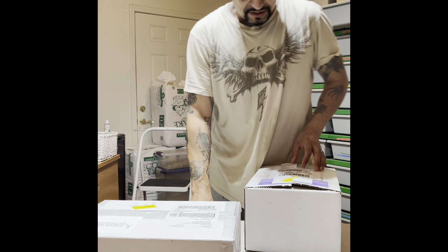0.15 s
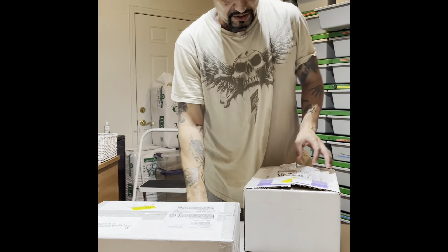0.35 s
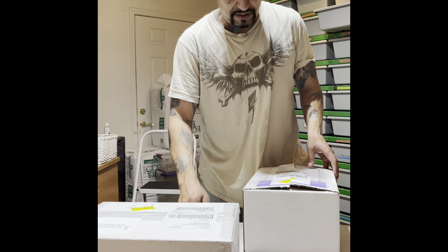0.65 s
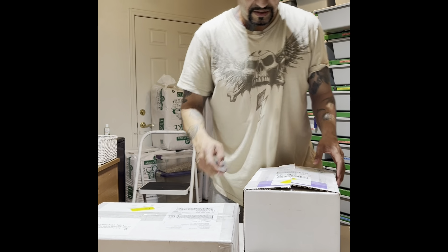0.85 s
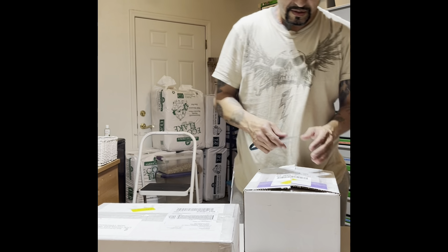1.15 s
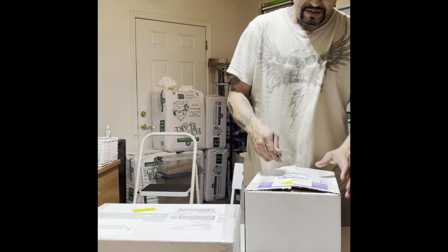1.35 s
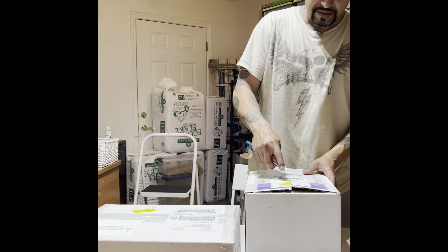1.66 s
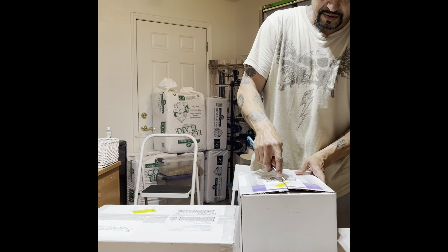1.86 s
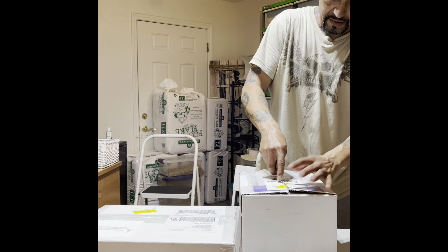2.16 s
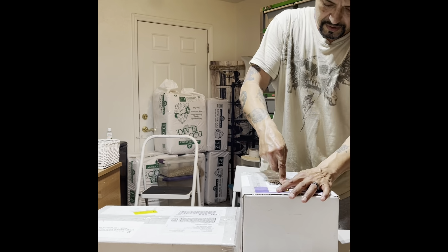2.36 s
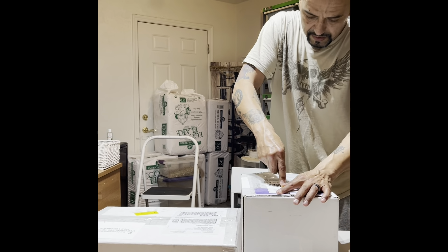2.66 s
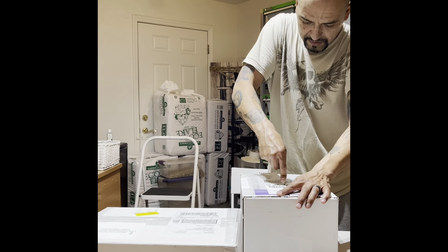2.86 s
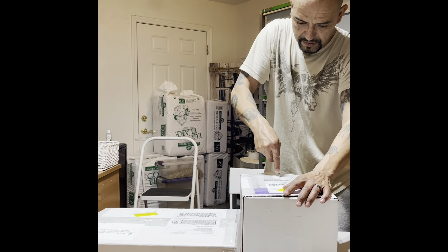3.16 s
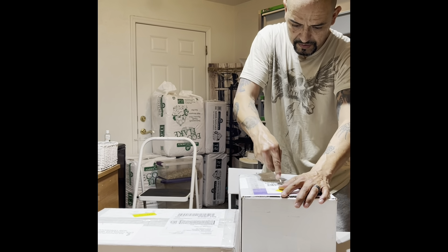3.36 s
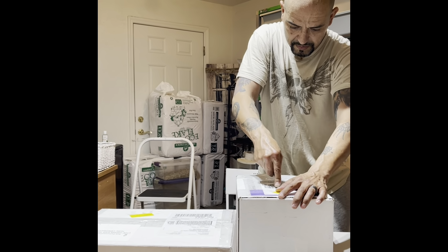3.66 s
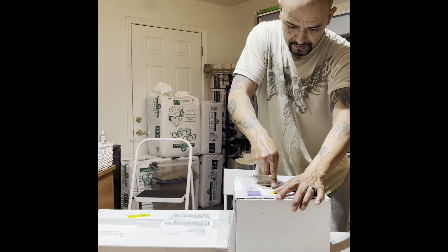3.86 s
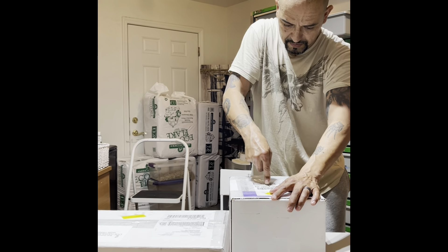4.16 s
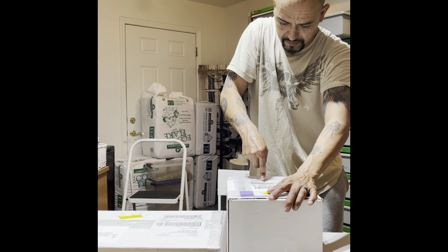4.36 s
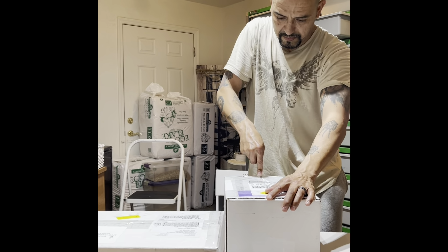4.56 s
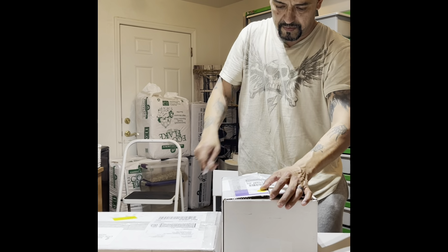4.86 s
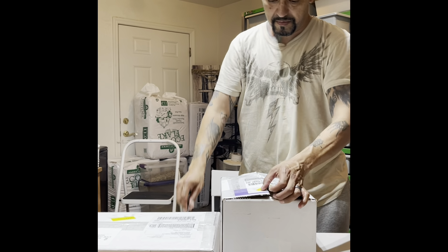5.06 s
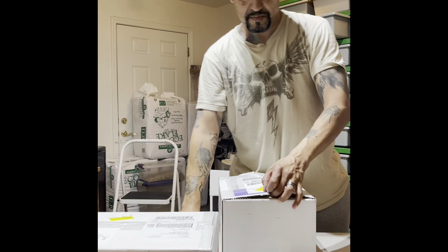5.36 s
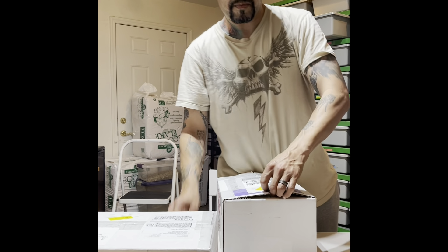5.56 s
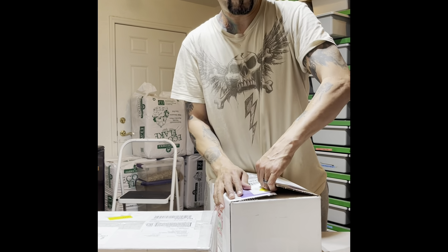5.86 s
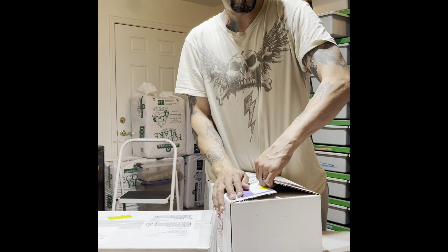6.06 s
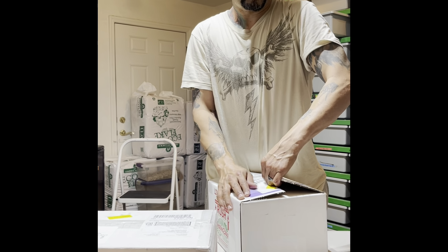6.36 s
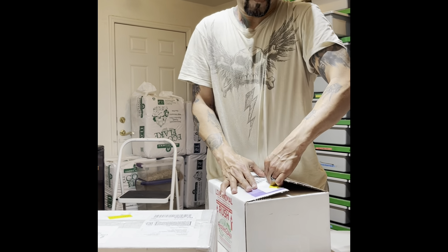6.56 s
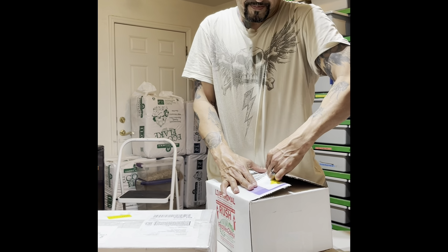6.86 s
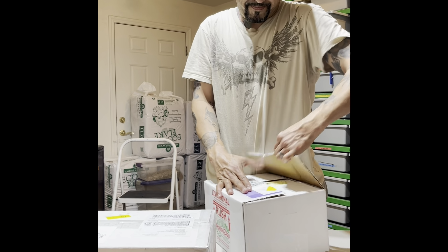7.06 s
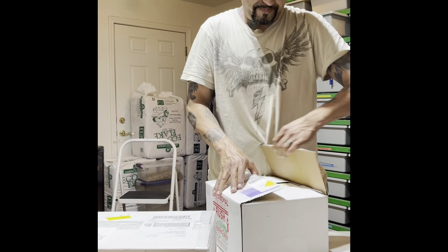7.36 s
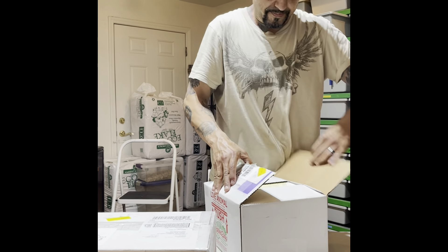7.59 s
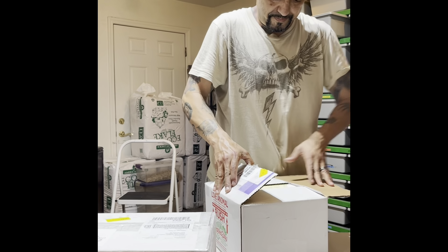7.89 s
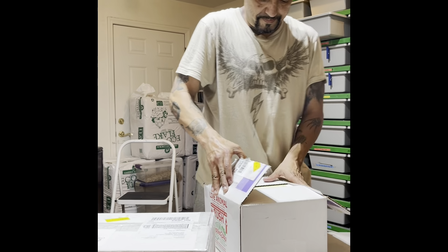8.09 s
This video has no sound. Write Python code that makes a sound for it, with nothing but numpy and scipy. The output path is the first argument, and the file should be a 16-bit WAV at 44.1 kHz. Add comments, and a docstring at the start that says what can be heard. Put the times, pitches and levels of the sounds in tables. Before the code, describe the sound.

A blade slits packing tape and saws a box seam, then is dropped with bouncing clacks before flaps tear open with loud snaps indoors

```python
"""Light knocks come first, as a man nudges a utility knife and lifts it off a big carton in a small storeroom.
He slits packing tape (sizzle and whistle), saws the seam and drops the knife, which bounces on the carton.
He pulls the flaps: tape snaps in sharp cracks, cardboard rings and creaks, and his hands hiss along it.
Blows are short pushes shaped by resonances; friction is a stream of tiny random slips, coloured by filters.
Room echoes and faint air noise surround it all, and a nearby phone picks it up in stereo."""
import sys
import numpy as np
from scipy import signal
from scipy.fft import rfft, irfft, next_fast_len
from scipy.io import wavfile
from scipy.ndimage import uniform_filter1d, map_coordinates

SR = 44100
rng = np.random.default_rng(int(sys.argv[2]) if len(sys.argv) > 2 else 0)


def unload_audio(sound):
    """Save the sound as a 16-bit wav file, at the path given as the first command line argument."""
    columns = np.transpose(np.atleast_2d(sound))
    # keep every value between -1 and 1, then stretch to whole-number steps
    steps = np.round(np.clip(columns, -1, 1) * 32767)
    wavfile.write(sys.argv[1], SR, steps.astype(np.int16))


N = 362898  # length in samples

# All table levels are relative: each layer adds its own gain.
# A t60 is the time a sound takes to fall by 60 dB.

# The knife is nudged and lifted off the carton, later dropped on it, and bounces to rest:
# start_s, level_db, clack_db, carton_ring_db, top_hz (of the contact's band), lid_hz (pitch at that spot)
KNIFE_KNOCKS = [(.029, -25, -4.5, 3, 2350, 604), (.107, -13, -14, -2.5, 1900, 677),
                (0.132, -19.5, -4.5, -2, 2370, 890), (.143, -17, -8, -3.5, 2370, 836),
                (0.279, -27, 2.5, -1, 2400, 950), (.329, -14.5, -15, -5, 1400, 610),
                (.338, -19, 0.5, -6, 2540, 1090), (5.44, -25.5, 8, 9, 4260, 655),
                (5.4898, 1.5, 6, -6.5, 3300, 1260), (5.495, -5.5, -10, -3, 2600, 1400),
                (5.5521, -1.5, 1.5, -8, 3330, 1020), (5.556, -6, 2.5, -4, 2700, 760),
                (5.5994, -6, 0, -9.5, 3200, 910), (5.639, -12.5, 2.5, 3, 3010, 1140),
                (5.669, -15.5, 5.5, 3, 3000, 990), (5.694, -19, -1.5, 4.5, 3080, 1200),
                (5.715, -17, -1, -2, 2300, 850), (5.732, -18.5, -0.5, -9, 2010, 1080),
                (5.763, -22.5, -4, -3, 1800, 833)]
# Tape snaps and the flap's fold ticks: start_s, level_db, treble_db, twang_hz, twang_width_octaves
TAPE_SNAPS = [(1.507, -46, -20, 2700, 0.48), (1.752, -37.5, -30, 1200, 1.07),
              (2.037, -42.5, -3.5, 1070, 0.99), (2.491, -25.5, 0, 890, .7), (2.86, -21, 0.5, 1500, 0.87),
              (3.143, -45, 1, 945, 0.64), (3.893, -27.5, -15, 2460, 0.92), (4.128, -32, -14, 1600, .55),
              (4.365, -27, -6.5, 2000, 0.95), (4.444, -33.5, 3, 3000, .7), (4.449, -37, 1, 3000, .7),
              (4.566, -39, -11, 1450, 0.78), (4.644, -29.5, -3, 3840, 0.46), (4.909, -41, -7, 2880, 0.16),
              (5.369, -33.5, -4.5, 2600, 0.84), (5.915, -4, -12, 2720, 0.85),
              (5.919, -15.5, -13, 1310, 1.4), (6.332, -47, 0, 1860, .7), (6.417, -48, 6.5, 1900, 0.55),
              (6.548, -53, 7, 3100, .7), (6.592, -1.5, -13, 2410, 0.41), (6.597, -11.5, -20, 1540, 0.28),
              (6.7638, -7, -8.5, 1950, 1.03), (6.769, -20, -5, 2400, 2.1), (6.852, -34.5, 4.5, 991, 0.64),
              (6.9095, -13, -1, 1800, 1.3), (6.919, -19, 0, 1400, 0.58), (6.951, -14, -5.5, 2300, 1.15),
              (6.955, -14.5, -7.5, 1900, 1.06), (7.568, -28, -31, 1650, 0.6), (7.583, -35, -21, 1540, 0.46),
              (8.127, -40, -7, 1570, .7)]
# Hands and flaps bump the box: start_s, level_db, deep_boom_db, pitch_hz
BOX_BUMPS = [(.53, -37, -16, 328), (1.75, -37, -12, 330), (2.046, -40, 2, 240), (2.101, -35.5, -25, 265),
             (2.251, -41.5, -2.5, 190), (2.44, -23.5, -10, 787), (2.488, -13.5, -24.5, 650),
             (2.52, -18, 7.5, 493), (2.547, -22, 7.5, 315), (2.729, -28.5, -15, 275.5),
             (2.82, -25, -26.5, 546), (2.853, -28, -20, 229), (3.403, -37.5, -12, 250),
             (3.797, -39, -22, 600), (3.878, -36.5, -8, 503), (3.893, -31.5, -3, 251),
             (3.942, -32, -6, 380), (4.123, -25, -7.5, 356), (4.272, -26, -7, 237),
             (4.318, -24.5, -12, 330), (4.363, -24, -3.5, 199), (4.366, -33, -22, 750),
             (4.478, -31, -12, 263), (4.503, -27.5, -6, 278), (5.26, -35.5, 4, 215), (6.43, -34, -17, 270),
             (6.954, -12, -10, 535), (6.964, -21.5, -16, 313), (7.482, -32, -3, 217),
             (7.574, -37, -11, 164), (7.64, -47, 2, 220), (8.061, -28.5, -4, 185)]
# Carton panels and flaps ring on after knocks, squeaks and snaps: start_s, level_db, pitch_hz, t60_s
PANEL_RINGS = [(.112, -19, 166, 1), (.33, -16, 570, .07), (0.414, -16, 163, 0.55),
               (0.441, -16.5, 989, 0.19), (5.492, -3, 170, 0.78), (5.492, -12, 355, 0.35),
               (5.916, -0.5, 429, 0.064), (5.917, -8.5, 255, 0.13), (6.592, -3, 274, 0.14),
               (6.763, -4, 1195, 0.3), (6.768, -6.5, 1014, 0.61), (6.767, -5.5, 341, 0.051)]
# The blade slits taut tape, one list per slit: time_s, level_db, whistle_hz
TAPE_SLITS = [
    [(2.1, -56, 6000), (2.13, -61, 6550), (2.22, -56, 6560), (2.35, -44, 6350), (2.45, -47.5, 6160),
     (2.6, -47, 6660), (2.8, -44, 6410), (2.88, -39.5, 6330), (2.96, -48.5, 6210), (3.06, -80, 6200)],
    [(3.29, -72, 7000), (3.34, -47.5, 7370), (3.76, -47.5, 7280), (3.88, -55, 7330)],
]
# Whistle against sizzle, one value per slit: level_db
WHISTLE_LEVELS = [-2, -17]
# The blade saws through cardboard: start_s, length_s, level_db, change_along_stroke_db
CARDBOARD_CUTS = [(1.755, 0.096, -63, -5), (2.425, 0.043, -43, -1), (2.48, 0.09, -37, -6.5),
                  (2.6, 0.18, -60.5, 5.5), (2.78, 0.085, -44.5, 3.5), (2.87, 0.16, -48, -10),
                  (3.87, 0.06, -55, 3), (3.925, .065, -47.5, -3), (4.07, 0.04, -60, 6),
                  (4.105, .03, -43.5, 1), (4.225, 0.095, -53, 6), (4.34, 0.18, -49.5, -3),
                  (4.53, 0.058, -53, -13)]
# Palms and shirt slide over cardboard: start_s, length_s, level_db, change_along_stroke_db
HAND_SLIDES = [(-.03, 0.13, -66, -1), (.39, 0.45, -55, -20.5), (1.22, 0.14, -65, 7),
               (1.29, 0.23, -53.5, -9.5), (1.55, 0.35, -66, -4), (1.99, 0.52, -71, 16),
               (3.0, 0.19, -62, -4), (4.57, 0.58, -59, -16.5), (5.245, 0.21, -57, -12),
               (5.67, 0.25, -50, -10.5), (5.95, 0.26, -62.5, -4.5), (6.215, 0.56, -58.5, -19.5),
               (7.12, 0.33, -55.5, 0.5), (7.46, 0.12, -64.5, 14.5), (7.57, 0.12, -52, -3.5),
               (7.68, 0.34, -60.5, -6.5), (7.94, 0.35, -59, -0.5)]
# The box grumbles as it is pushed about: start_s, length_s, level_db, change_along_push_db
BOX_PUSHES = [(.1, 0.46, -57.5, 3), (.6, 0.44, -61, -3), (1.3, 0.57, -68, 9), (2.03, 0.34, -58, -18),
              (2.48, 0.26, -41.5, -17), (2.79, 0.066, -36, -1), (2.88, 0.2, -45.5, -2),
              (3.1, 0.12, -56, -8), (3.39, 0.083, -53, -4), (3.79, 0.11, -51.5, 1.5),
              (3.88, 0.094, -43.5, -1.5), (4.0, 0.36, -51, 3), (4.27, 0.32, -45, -9.5),
              (4.53, 0.33, -62.5, 0), (5.19, 0.17, -59, 7), (5.45, 0.37, -45.5, -9), (6.22, 0.62, -53, -15),
              (6.95, 0.19, -43, -5.5), (7.13, 0.37, -61.5, 4.5), (7.52, 0.26, -49.5, -9.5),
              (7.93, 0.091, -54.5, 3), (8.04, 0.21, -51.5, -3)]
# The knife squeaks on the carton and the flap's fold creaks:
# middle_s, length_s, level_db, slips_per_s, resonance_hz, pitch_bend_octaves_per_s
SQUEAK_EVENTS = [(0.273, 0.045, -44.5, 185, 575, 2), (0.418, 0.013, -47, 590, 1900, 1),
                 (0.446, 0.03, -43, 630, 1880, -0.1), (0.447, 0.036, -45, 620, 1160, -0.5),
                 (0.464, 0.028, -53, 630, 3820, -1.5), (0.553, 0.016, -48.5, 1000, 2950, -1.5),
                 (0.575, 0.013, -43.5, 1150, 3340, -0.5), (.568, 0.018, -45, 930, 2120, 3.5),
                 (0.584, 0.018, -46.5, 300, 1680, 3.5), (5.19, 0.12, -65.5, 290, 2200, 0.5),
                 (7.633, 0.035, -47.5, 160, 476, -3), (7.754, .014, -52.5, 260, 1400, -4),
                 (7.778, 0.056, -51, 160, 508, -2), (7.879, 0.065, -58, 203, 553, -2)]

# Ringing tones of the big carton: pitch_hz, level_db, t60_s
CARTON_TONES = [(167.4, -12.5, 0.7), (350, -10, 0.46), (545, 1.5, 0.25), (683, 5, 0.11), (971, 3, 0.12),
                (1177, -1.5, 0.18), (1404, -6.5, 0.15)]
# Ringing tones of the air and walls of the box: pitch_hz, level_db, t60_s
BOOM_TONES = [(56.8, 3, 0.25), (86, -11, 0.44), (117.5, -7, 0.47)]
# Resonances of the knife's handle: centre_hz, width_hz, level_db
HANDLE_RESONANCES = [(1465, 250, 3.5), (1950, 360, 1), (2400, 280, 1.5), (2700, 300, 3), (3036, 440, 2),
                     (6200, 1900, -6), (7740, 700, -17), (11000, 2500, -0.5)]
# Resonances of the loose steel blade: centre_hz, width_hz, level_db
BLADE_RESONANCES = [(6200, 870, -8.5), (7540, 340, 10), (10000, 4400, 6)]
# Resonances of cardboard ridges giving way: centre_hz, width_hz, level_db
CRUNCH_RESONANCES = [(330, 230, -1.5), (680, 450, 0), (1400, 920, -3.5), (2400, 620, -4)]

# Spectrum of snapping or crinkling tape: frequency_hz, level_db (per Hz)
SNAP_SPECTRUM = [(100, -59), (500, -29), (1200, -23), (2500, -5), (4000, -5.5), (7000, -0.5), (9000, 2.5),
                 (10800, 4), (12300, -5), (15500, -65.5)]
# Spectrum of skin and cloth on cardboard: frequency_hz, level_db (per Hz)
PALM_SPECTRUM = [(150, -3), (600, -8.5), (2000, -5.5), (4500, -6.5), (6500, -5), (8500, -0.5), (10800, 3),
                 (12000, -10.5), (13200, -21.5), (15500, -59.5)]
# Spectrum of tape film parting: frequency_hz, level_db (per Hz)
FILM_SPECTRUM = [(300, -23), (1300, -28), (2200, -15.5), (3500, -26), (4400, -12), (5100, -16),
                 (6000, -5.5), (8000, 2), (9300, 2), (11000, 2.5), (12000, -12), (13000, -36.5),
                 (15000, -84.5)]
# Spectrum of breaking paper fibres: frequency_hz, level_db (per Hz)
FIBRE_SPECTRUM = [(100, 5), (300, -7.5), (800, 6.5), (1500, 1), (2600, 1), (4000, 1.5), (6500, 3),
                  (9000, 5.5), (10800, 6.5), (12200, -2), (13500, -16.5), (15500, -62)]
# Spectrum of grumbling box walls: frequency_hz, level_db (per Hz)
WALL_SPECTRUM = [(25, -38.5), (42, -5.5), (56, -0.5), (72, -1), (110, -7), (170, 3), (300, -4.5),
                 (500, -6.5), (900, -18.5), (2000, -17), (5000, -38.5)]
# Spectrum of the background air noise: frequency_hz, level_db (per Hz)
AIR_SPECTRUM = [(25, -19), (56, 14), (100, -1.5), (170, 5), (400, -17), (900, -17), (1500, -25),
                (5000, -27.5), (11000, -49.5), (13000, -63), (15000, -91)]
# How long the room's echoes last: frequency_hz, t60_s
ROOM_DECAY = [(60, 0.91), (200, 0.24), (600, 0.32), (2500, 0.42), (6000, 0.41), (12000, 0.37)]
# How far the left channel leads the right: frequency_hz, lead_radians
LEFT_LEAD = [(20, 0), (1900, .1), (3000, .95), (4100, .9), (4850, 3.1), (5600, 6.1), (6150, 6.35),
             (8800, 9.3), (9500, 9.5), (12100, 12.5), (16000, 12.6)]
# Stereo side share of the room's sound: frequency_hz, level_db
ROOM_SPREAD = [(100, -31.5), (350, -13.5), (550, -7), (800, -3.5), (1300, -6), (1750, -19), (2600, -4.5),
               (4000, -2), (5200, -2), (5900, -24), (7000, -0.5), (9000, -29), (11000, 1.5), (12500, -15)]

FLAP_DB = -0.5  # the flap's knock in every snap, before the snap's own level
SLIDE_ATTACK_S, SLIDE_RELEASE_S = 0.05, 0.096  # rise; time to fall 60 dB
PUSH_ATTACK_S, PUSH_RELEASE_S = 0.012, 0.088
CUT_ATTACK_S, CUT_RELEASE_S = 0.02, 0.2
TOP_HZ = 15800  # upper limit of the sound


def knife_knocks():
    """The handle clacks, its blade rattles, the lid knocks hollowly and the big carton rings on."""
    out, t = np.zeros(N), np.arange(SR // 2) / SR
    rattle_spectrum = [(3000, -1.5), (5500, -8.0), (11500, -15.0), (13500, -40.5)]
    for start_s, db, clack_db, ring_db, top_hz, lid_hz in KNIFE_KNOCKS:
        # a softer contact has a lower top and a duller clack
        band = [(200, -8), (500, 0), (top_hz, 0), (1.25 * top_hz, -13), (1.8 * top_hz, -18), (4.1 * top_hz, -36)]
        push = colour(fracture(t, spread=.001), band)
        # the handle sounds a little different on each side it lands on
        handle = [(hz * rng.normal(1, .025), width, level) for hz, width, level in HANDLE_RESONANCES]
        clack = unit_energy(resonate(push, handle))
        loose_contact = colour(contact(t, t60=0.23, rough=4), rattle_spectrum)
        rattle = unit_energy(resonate(loose_contact, BLADE_RESONANCES))
        hardness = (top_hz / 3400) ** 4
        knife = amp(clack_db) * (clack + amp(-5.5) * hardness * rattle)
        lid = unit_energy(resonate(push, [(600, 170, -5), (lid_hz, 0.23 * lid_hz, 0)]))
        carton = amp(ring_db) * ring(CARTON_TONES, t)
        add(out, start_s, amp(db + 3.5) * (knife + lid + carton))
    return bend(out, delay=0.00075)


def tape_snaps():
    """Tape parts in one broadband crack: the film's treble, the freed edge's twang and the flap's knock."""
    out, t, hz = np.zeros(N), np.arange(SR // 4) / SR, np.fft.rfftfreq(1024, 1 / SR)
    film = unit(amp(along(SNAP_SPECTRUM, hz)))
    flap = amp(FLAP_DB) * hump(hz, centre_hz=480, octaves=0.82)
    for start_s, db, treble_db, twang_hz, octaves in TAPE_SNAPS:
        treble = amp(treble_db + 20.5) * film
        twang = amp(9.0) * hump(hz, twang_hz, octaves)
        power = treble ** 2 + twang ** 2 + flap ** 2
        spectrum = np.column_stack([hz, 10 * np.log10(power)])
        add(out, start_s, amp(db) * colour(fracture(t, spread=.0009), spectrum))
    return bend(out, delay=0.000995)


def slitting():
    """Film parts in a fine sizzle while the blade whistles on its edge."""
    out, t = np.zeros(N), np.arange(N) / SR
    for rows, whistle_db in zip(TAPE_SLITS, WHISTLE_LEVELS):
        film = colour(grains(rate=14000, scatter_db=-0.5), FILM_SPECTRUM)
        sizzle = unit(film * amp(1.1 * wobble(50)))
        pitch_hz = curve(rows, axis=2) * (1 + .008 * wobble(40) + .016 * wobble(1500))
        phase = 2 * np.pi * np.cumsum(pitch_hz) / SR
        # three tones (pitch ratio, dB), each swelling and fading at random
        partials = [(.92, -7.5), (1, -4.5), (1.85, -7)]
        tones = sum(amp(db) * np.sin(ratio * phase) * wobble(300) for ratio, db in partials)
        whistle = unit(colour(tones, [(12000, 0), (13000, -30)]))
        # smooth the on/off steps where the blade meets and leaves the tape
        touching = uniform_filter1d(1.0 * ((t >= rows[0][0]) & (t <= rows[-1][0])), size=600)
        out += touching * amp(curve(rows) - 0.5) * (sizzle + amp(whistle_db) * whistle)
    return out


def cutting():
    """Paper fibres break in clumps as the blade crosses the corrugations, which give way with a crunch."""
    clumps = amp(3.5 * wobble(80))
    fibres = unit(colour(clumps * grains(rate=1500, scatter_db=3), FIBRE_SPECTRUM))
    crunch = unit(resonate(clumps * grains(rate=220, scatter_db=3), CRUNCH_RESONANCES))
    gain = strokes(CARDBOARD_CUTS, CUT_ATTACK_S, CUT_RELEASE_S)
    return gain * (amp(4.5) * fibres + amp(-2.0) * crunch)


def box_bumps():
    """A soft blow thuds on a panel; the air in the box swells into a boom."""
    out, t = np.zeros(N), np.arange(SR // 2) / SR
    for start_s, db, boom_db, pitch_hz in BOX_BUMPS:
        panel = resonate(contact(t, t60=0.071, rough=1.36), [(pitch_hz, .55 * pitch_hz, 0)])
        thud = unit_energy(colour(panel, [(60, -14.5), (160, 10.5), (800, -2.5), (3000, -21.5)]))
        boom = ring(BOOM_TONES, t) * (1 - np.exp(-t / 0.0054))
        add(out, start_s, amp(db + 15.0) * (thud + amp(boom_db) * boom))
    return out


def panel_rings():
    """Cardboard rings hoarsely: the tone's tuning wavers at random."""
    out, t = np.zeros(N), np.arange(SR // 2) / SR
    for start_s, db, pitch_hz, t60 in PANEL_RINGS:
        waver = 1 + .025 * map_coordinates(rng.standard_normal(100), [150 * t])
        tone = np.sin(2 * np.pi * np.cumsum(pitch_hz * waver) / SR)
        envelope = amp(-60 * t / t60) * (1 - np.exp(-t / 0.0011))
        add(out, start_s, amp(db) * unit_energy(tone * envelope))
    return out


def squeaks():
    """A dragged edge sticks and slips at an unsteady, bending rate."""
    out, t = np.zeros(N), np.arange(-SR // 4, SR // 4) / SR  # zero is the squeak's middle
    for middle_s, length, db, rate, body_hz, glide in SQUEAK_EVENTS:
        unsteady = 1 + .028 * map_coordinates(rng.standard_normal(100), [120 * (t - t[0])])
        slip_rate = rate * 2 ** (glide * np.clip(t, -length, length)) * unsteady
        turns = np.cumsum(slip_rate) / SR
        # one click per whole turn, plus some rough noise
        slips = unit(np.diff(np.floor(turns), prepend=0)) + .45 * rng.standard_normal(len(t))
        body = [(0.7 * body_hz, 0.25 * body_hz, -6), (body_hz, 0.11 * body_hz, 0),
                (1.62 * body_hz, 0.085 * body_hz, -8)]
        voice = unit(resonate(slips, body))
        swell = amp(db - 9 * np.abs(t) / (length / 2))  # loudest in the middle
        add(out, max(middle_s + t[0], 0), swell * voice)
    return out


def sliding_hands():
    """Skin and cloth hiss on the cardboard in many tiny slips, and loose tape crinkles along."""
    hiss = unit(colour(grains(rate=9000, scatter_db=2), PALM_SPECTRUM)) * amp(2 * wobble(45))
    crinkle = amp(-13) * unit(colour(grains(rate=45, scatter_db=5), SNAP_SPECTRUM))
    return amp(6.0) * strokes(HAND_SLIDES, SLIDE_ATTACK_S, SLIDE_RELEASE_S) * (hiss + crinkle)


def pushed_walls():
    """The box walls turn small slips under the push into a low grumble."""
    walls = unit(colour(grains(rate=900, scatter_db=4.0), WALL_SPECTRUM)) * amp(0.84 * wobble(25))
    return amp(-3.5) * strokes(BOX_PUSHES, PUSH_ATTACK_S, PUSH_RELEASE_S) * walls


def room(x, size=16384):
    """Two unrelated echoes of x; each frequency dies at its own speed."""
    echo = np.zeros((2, N))
    # each block of sound gets fresh random echo tails
    for start in range(0, N, size):
        hz, t, z = signal.stft(rng.standard_normal((2, SR // 2)), SR, nperseg=256)
        decay = amp(-60 * t / along(ROOM_DECAY, hz)[:, None])
        build_up = 1 - np.exp(-t / 0.00065)
        tails = signal.istft(z * decay * build_up, SR, nperseg=256)[1]
        for track, tail in zip(echo, tails):
            add(track, start / SR, signal.fftconvolve(x[start:start + size], unit_energy(tail)))
    tint = [(100, 3.5), (300, 5.5), (1200, 0.0), (2700, -3), (6000, -2.5), (11000, -4.5)]
    return filtered(echo, lambda f: amp(along(tint, f)))


def air_noise():
    """Steady random noise, strongest in the bass, lies faintly behind everything."""
    return amp(-67.5) * unit(colour(rng.standard_normal(N), AIR_SPECTRUM))


def fracture(t, spread, grain_hz=350):
    """All frequencies are equally strong, but each lets go at its own moment, about spread s late on average."""
    hz = np.fft.rfftfreq(len(t), 1 / SR)
    random_curve = map_coordinates(rng.standard_normal(int(hz[-1] / grain_hz) + 4), [hz / grain_hz])
    late = spread * random_curve ** 2
    crack = irfft(np.exp(-2j * np.pi * np.cumsum(late) * hz[1]), len(t))
    return crack * np.exp(-(t / .02) ** 2)


def contact(t, t60, rough):
    """A sharp push with a short, fading crunch of noise."""
    return (t == 0) + rough * unit_energy(rng.standard_normal(len(t)) * amp(-60 * t / t60))


def bend(x, delay):
    """Bending waves in a sheet: treble runs ahead, bass trails; delay is the travel time in s at 1 kHz."""
    return filtered(x, lambda f: np.exp(-4j * np.pi * delay * np.sqrt(1000 * f)))


def ring(modes, t):
    """Fading tones; their strength and tuning vary a little at random from blow to blow."""
    total = 0
    for hz, db, t60 in modes:
        level = amp(db + rng.normal(0, 2) - 60 * t / t60)
        total = total + level * np.sin(2 * np.pi * hz * rng.normal(1, .008) * t)
    return unit_energy(total)


def resonate(x, peaks):
    """Pass x through broad (Hz, width, dB) resonances, neighbours with opposite signs."""
    def response(f):
        return sum((-1) ** k * amp(db) * 1j * f * width / (centre * centre - f * f + 1j * f * width)
                   for k, (centre, width, db) in enumerate(peaks))
    return filtered(x, response)


def grains(rate, scatter_db):
    """Tiny slips at random moments, rate per second on average, of uneven size."""
    slips = (rng.random(N) < rate / SR) * rng.choice([-1, 1], N)
    return unit(slips * amp(scatter_db * np.clip(rng.standard_normal(N), -2, 2)))


def strokes(rows, attack_s, release_s):
    """The gain of friction strokes: each sets in, swells or fades as it goes and dies away."""
    t, gain = np.arange(N) / SR, np.zeros(N)
    for start_s, length, db, change_db in rows:
        rise = np.clip((t - start_s) / attack_s, 0, 1)
        drift_db = change_db * np.clip((t - start_s) / length, 0, 1)
        fall_db = 60 * np.maximum(t - start_s - length, 0) / release_s
        gain = np.maximum(gain, rise * amp(db + drift_db - fall_db))
    return gain


def wobble(rate):
    """A smooth random curve through rate random points a second."""
    return map_coordinates(rng.standard_normal(int(N * rate / SR) + 4), [np.arange(N) * rate / SR])


def colour(x, points, size=8192):
    """Give x a spectrum with a filter that only acts after each sound, never before it."""
    cepstrum = irfft(np.log(amp(along(points, np.fft.rfftfreq(size, 1 / SR)))))
    # folding the second half onto the first gives minimum phase
    cepstrum[1:size // 2] *= 2
    cepstrum[size // 2 + 1:] = 0
    return signal.fftconvolve(x, irfft(np.exp(rfft(cepstrum))))[:len(x)]


def filtered(x, response):
    """Multiply the spectrum of x by a response of frequency."""
    n = x.shape[-1]
    m = next_fast_len(n + SR // 4)
    return irfft(rfft(x, m) * response(np.fft.rfftfreq(m, 1 / SR)), m)[..., :n]


def hump(hz, centre_hz, octaves):
    """A broad, smooth band around a centre frequency, rms 1."""
    return unit(np.exp(-.5 * (np.log2((hz + 1) / centre_hz) / octaves) ** 2))


def along(points, hz):
    """Read (Hz, value) points on a logarithmic frequency axis."""
    f, v = np.transpose(points)
    return np.interp(np.log(hz + 1), np.log(f + 1), v)


def curve(rows, axis=1):
    """One column of a table, one value per sample."""
    rows = np.asarray(rows)
    return np.interp(np.arange(N) / SR, rows[:, 0], rows[:, axis])


def amp(db):
    """Turn decibels into a plain factor."""
    return 10 ** (np.asarray(db) / 20)


def unit(x):
    """Scale x to rms 1."""
    return x / np.sqrt(np.mean(x ** 2) + 1e-20)


def unit_energy(x):
    """Scale x to a total energy of 1."""
    return x / np.sqrt(np.sum(x ** 2) + 1e-20)


def add(track, start_s, x):
    """Mix x into the track at start_s seconds."""
    part = track[round(start_s * SR):][:len(x)]
    part += x[:len(part)]


def scene():
    """Blows and friction in the room, picked up by two close microphone ports."""
    knife, snaps, bumps = knife_knocks(), tape_snaps(), box_bumps() + panel_rings()
    friction = slitting() + cutting() + squeaks() + sliding_hands() + pushed_walls()
    into_room = amp(-3.5) * knife + amp(-0.5) * snaps + amp(-6.0) * bumps + amp(-2.5) * friction
    near, across = room(into_room)
    mid = knife + snaps + bumps + friction + near + air_noise()
    side = filtered(across, lambda hz: amp(along(ROOM_SPREAD, hz)))
    return np.array([mid + side, mid - side])


def record(dry):
    """The phone drops the deepest bass and shifts its channels against each other; the top treble is left out."""
    lean = signal.sosfilt(signal.butter(6, 44, "highpass", fs=SR, output="sos"), dry)

    def response(hz):
        shift = np.exp(.5j * np.outer([1, -1], along(LEFT_LEAD, hz)))  # half the lead each way
        return shift * np.clip((TOP_HZ - hz) / 500, 0, 1)
    return filtered(lean, response)


dry = scene()
out = record(dry)
unload_audio(out)
```